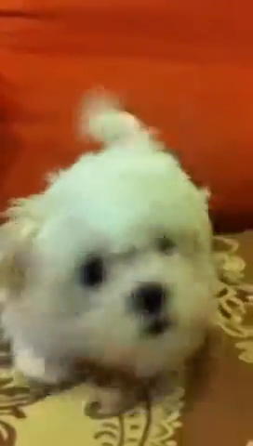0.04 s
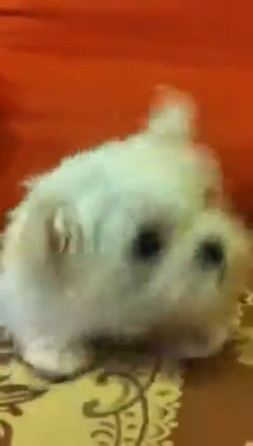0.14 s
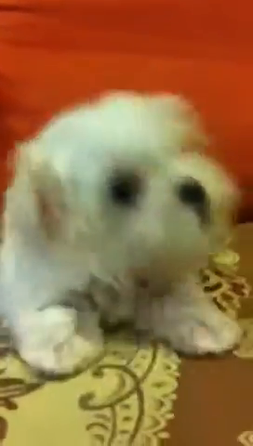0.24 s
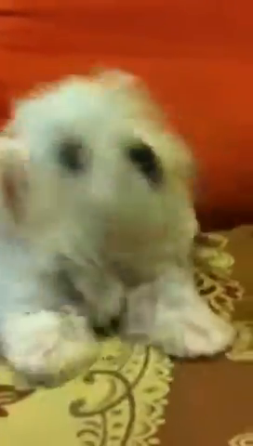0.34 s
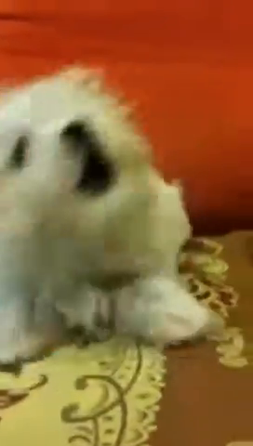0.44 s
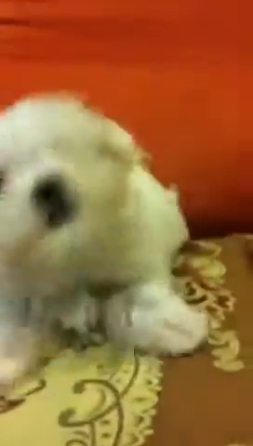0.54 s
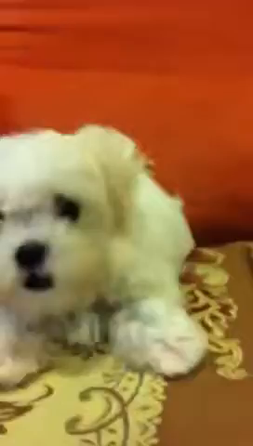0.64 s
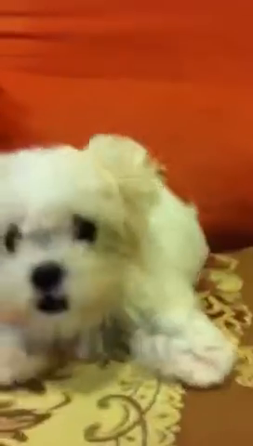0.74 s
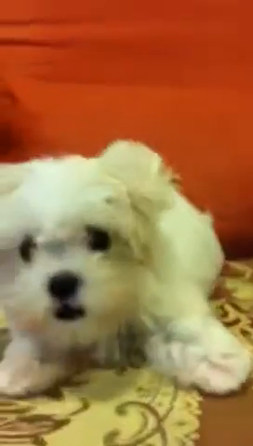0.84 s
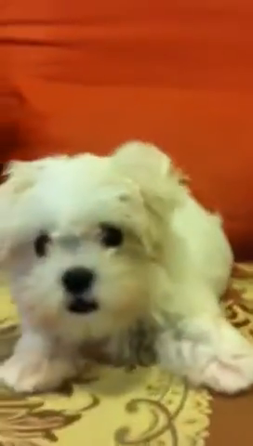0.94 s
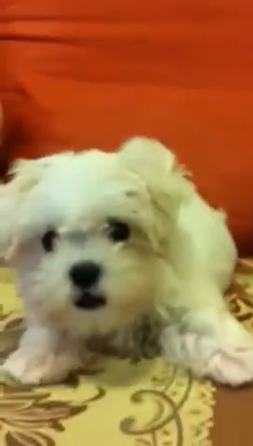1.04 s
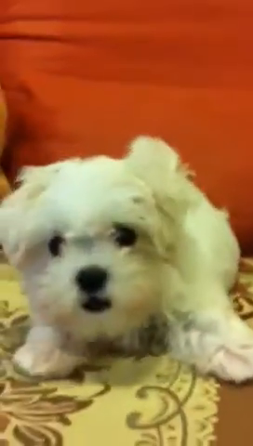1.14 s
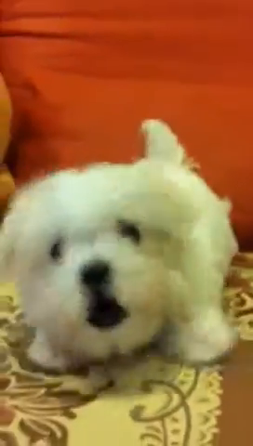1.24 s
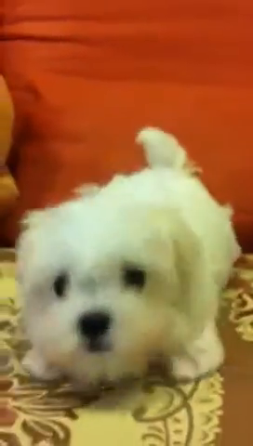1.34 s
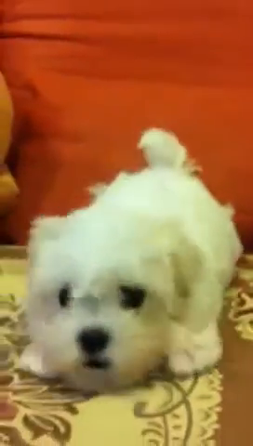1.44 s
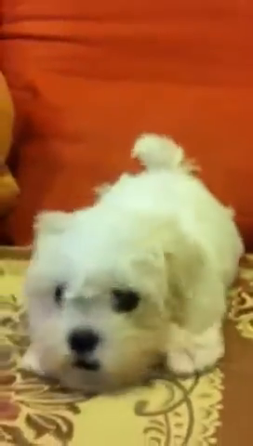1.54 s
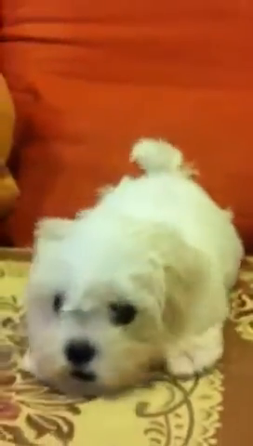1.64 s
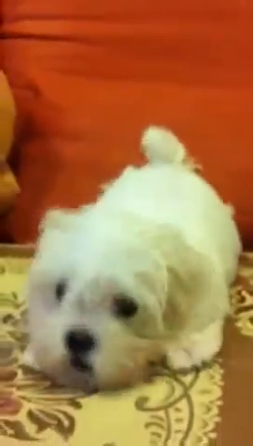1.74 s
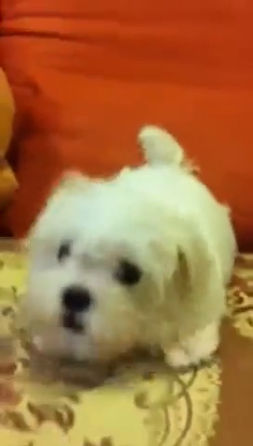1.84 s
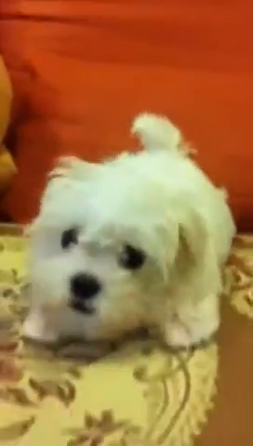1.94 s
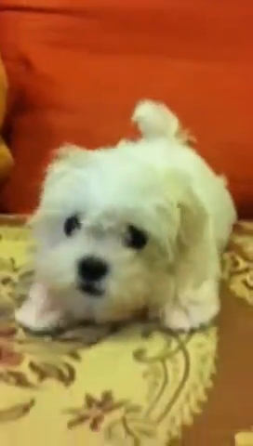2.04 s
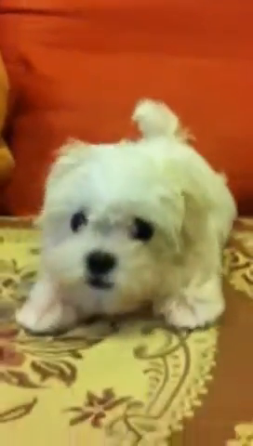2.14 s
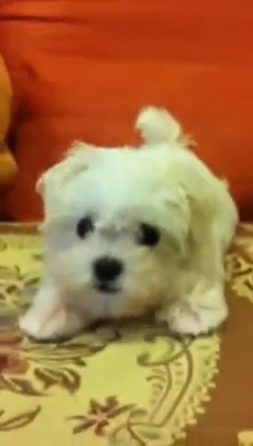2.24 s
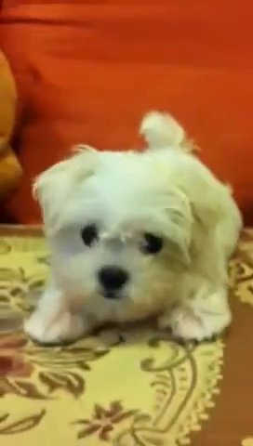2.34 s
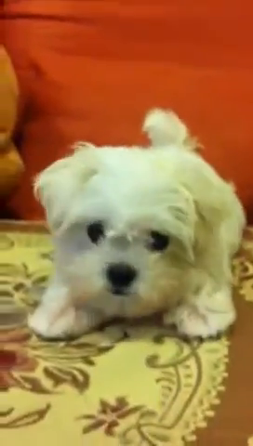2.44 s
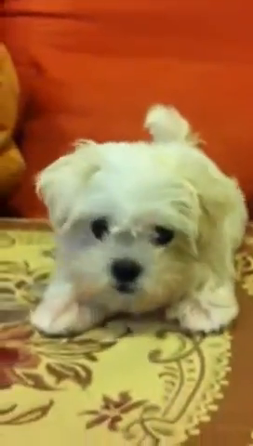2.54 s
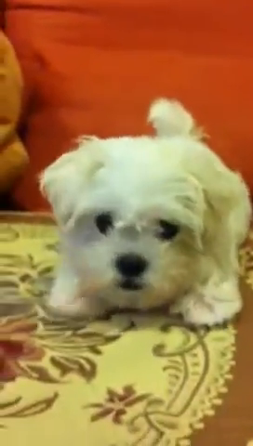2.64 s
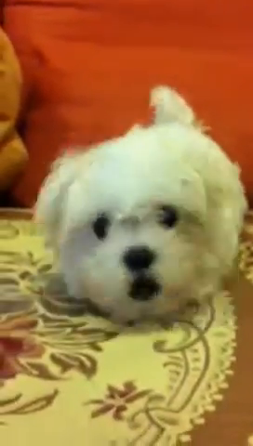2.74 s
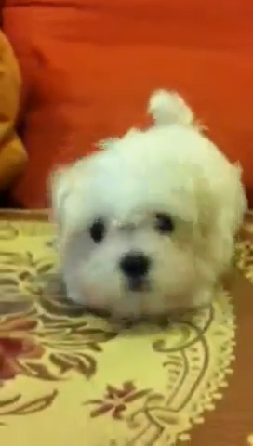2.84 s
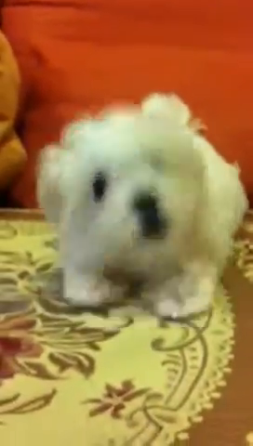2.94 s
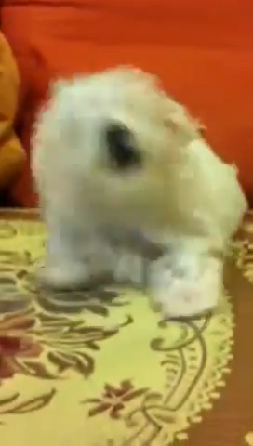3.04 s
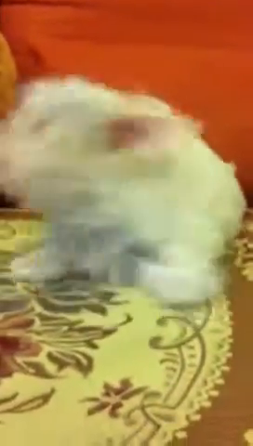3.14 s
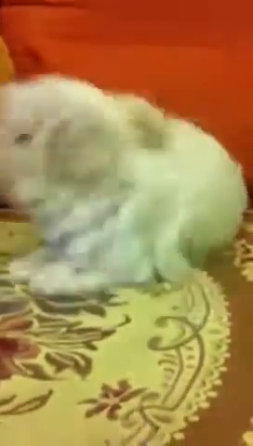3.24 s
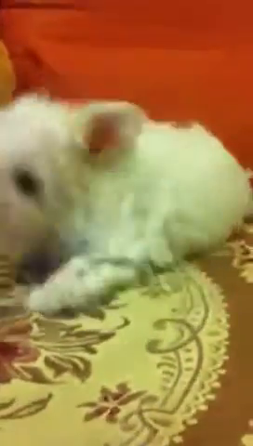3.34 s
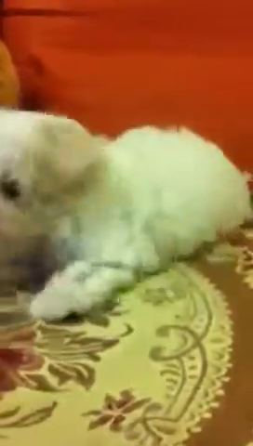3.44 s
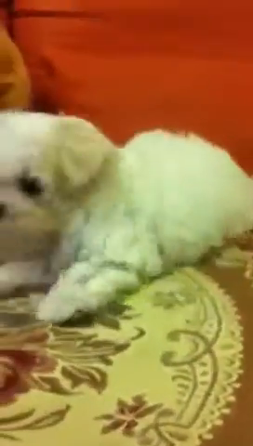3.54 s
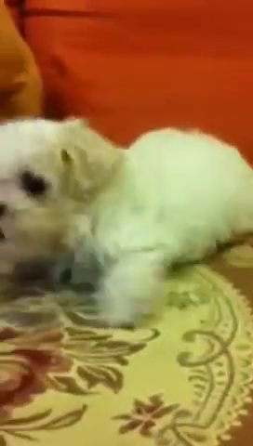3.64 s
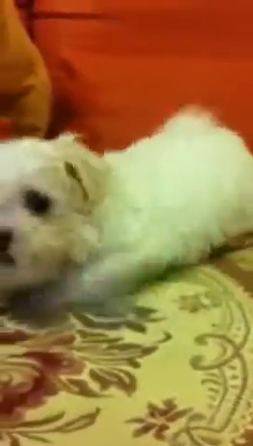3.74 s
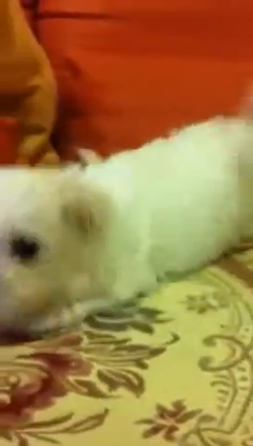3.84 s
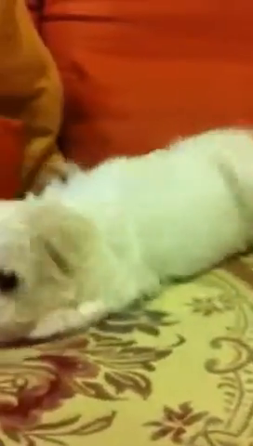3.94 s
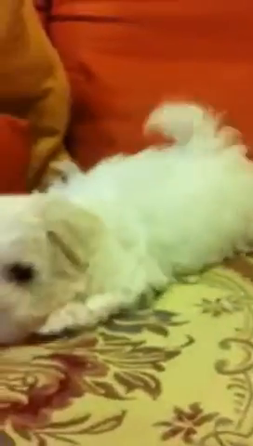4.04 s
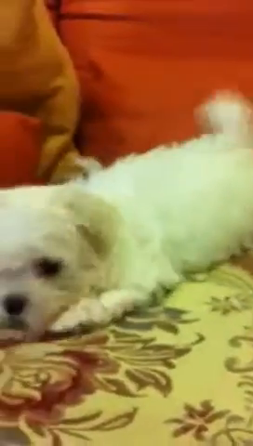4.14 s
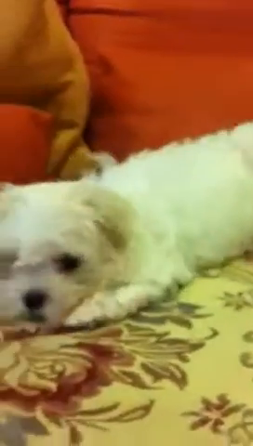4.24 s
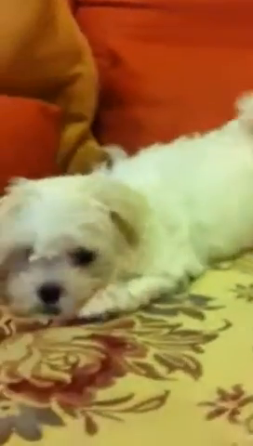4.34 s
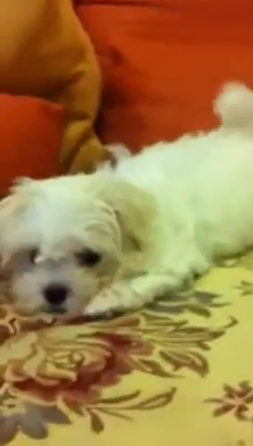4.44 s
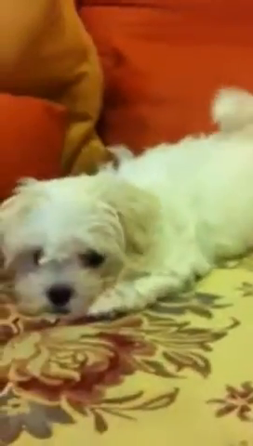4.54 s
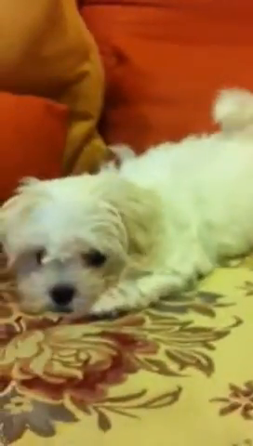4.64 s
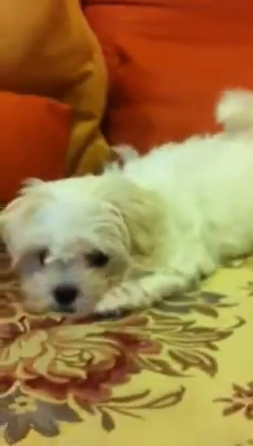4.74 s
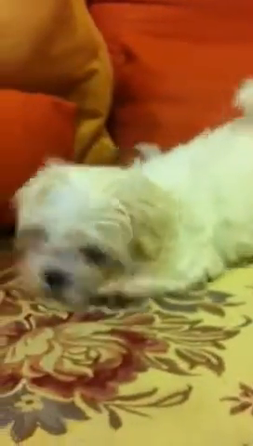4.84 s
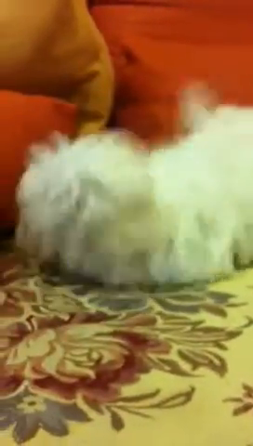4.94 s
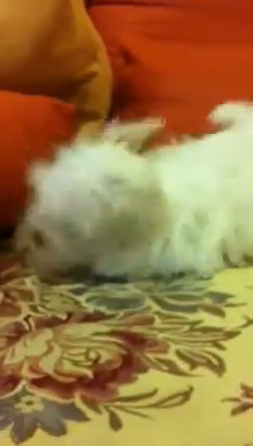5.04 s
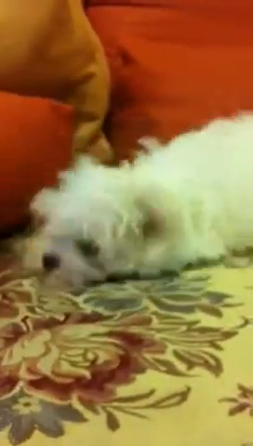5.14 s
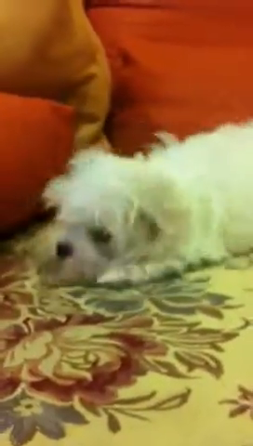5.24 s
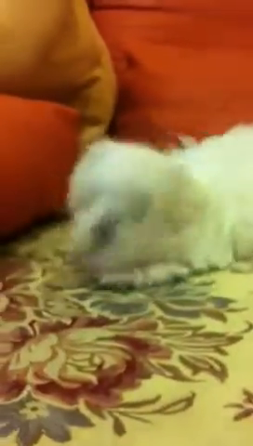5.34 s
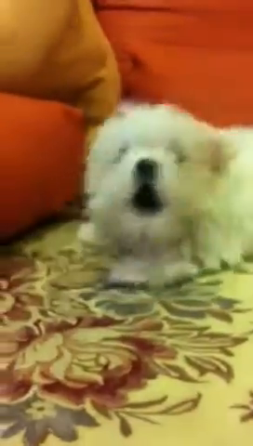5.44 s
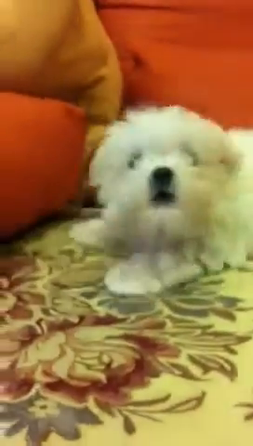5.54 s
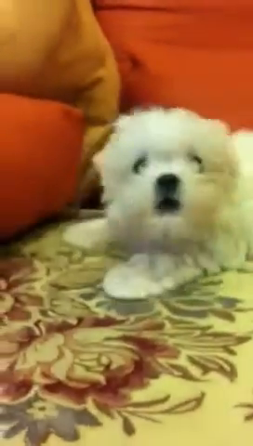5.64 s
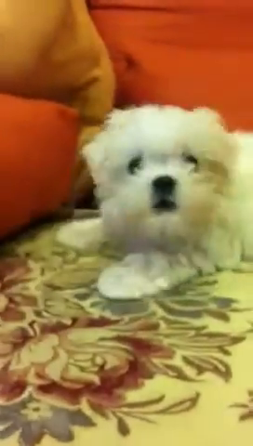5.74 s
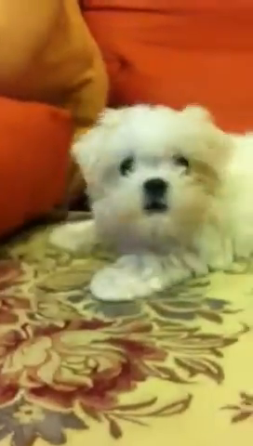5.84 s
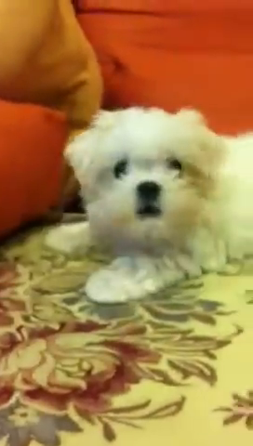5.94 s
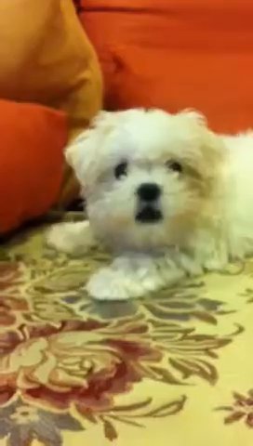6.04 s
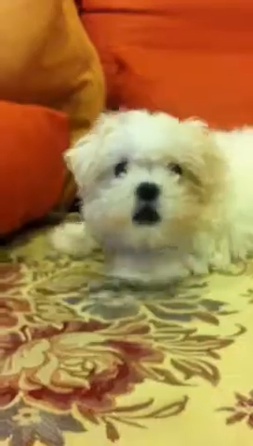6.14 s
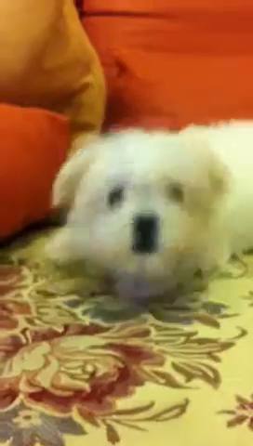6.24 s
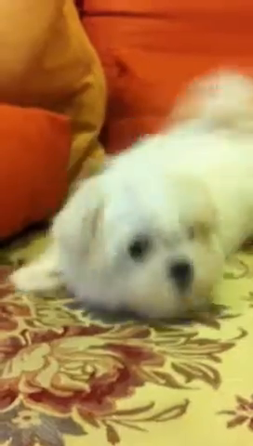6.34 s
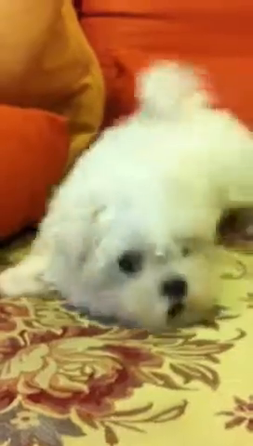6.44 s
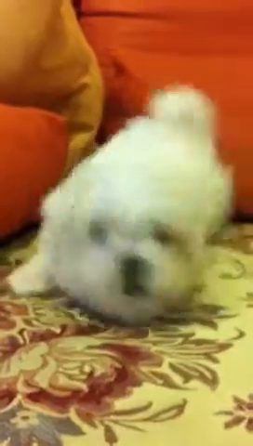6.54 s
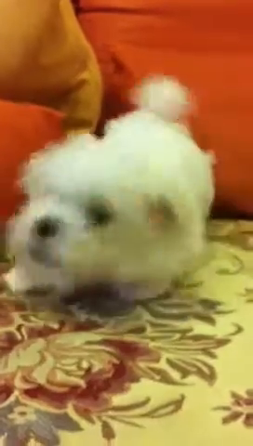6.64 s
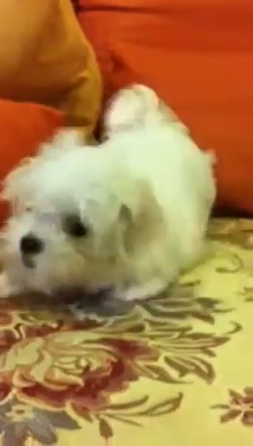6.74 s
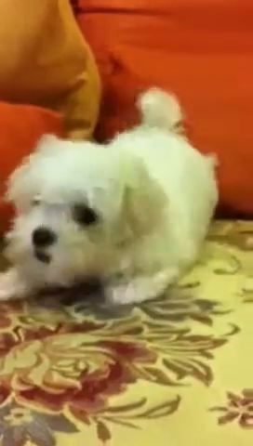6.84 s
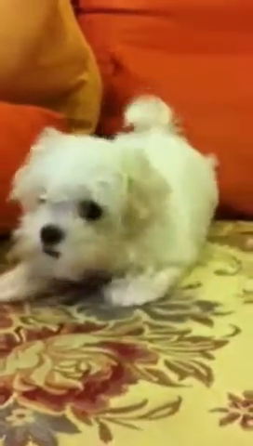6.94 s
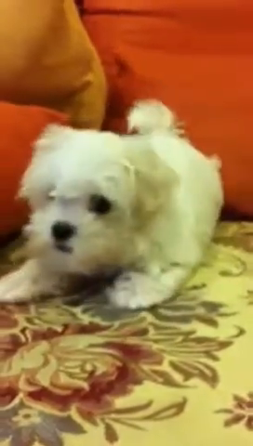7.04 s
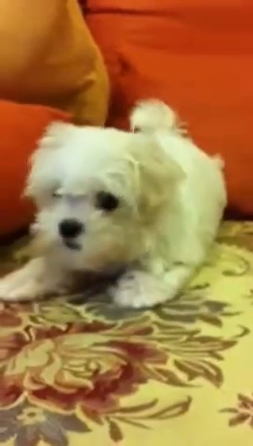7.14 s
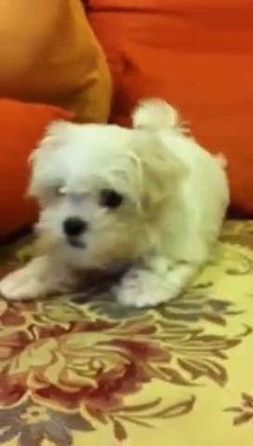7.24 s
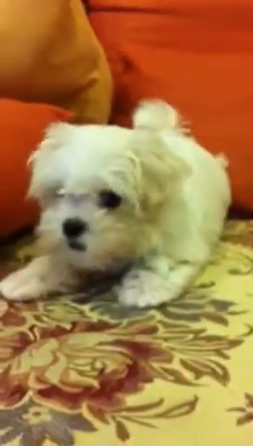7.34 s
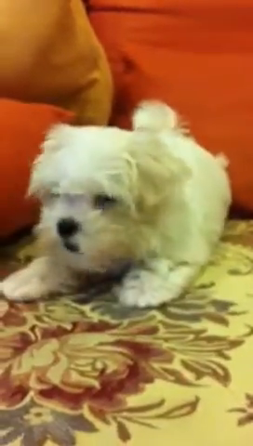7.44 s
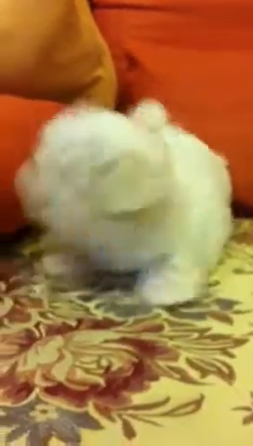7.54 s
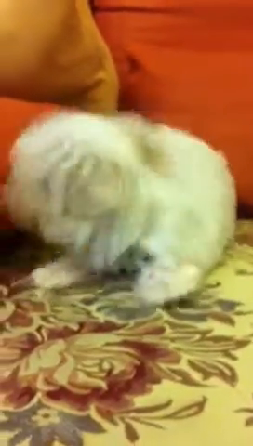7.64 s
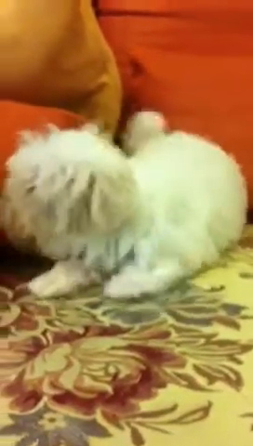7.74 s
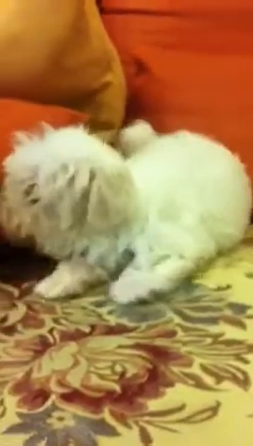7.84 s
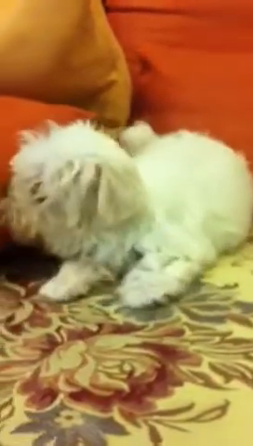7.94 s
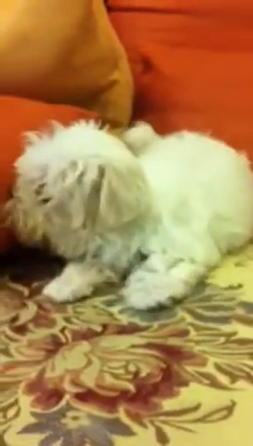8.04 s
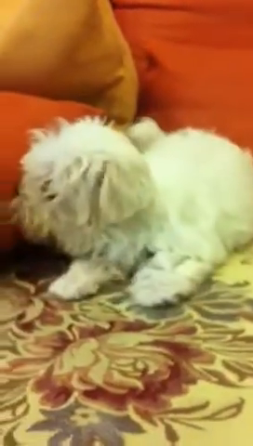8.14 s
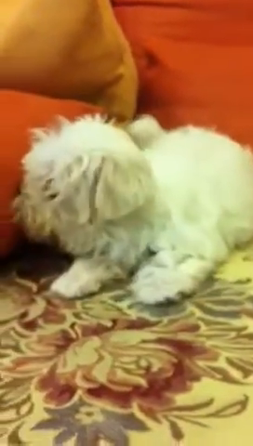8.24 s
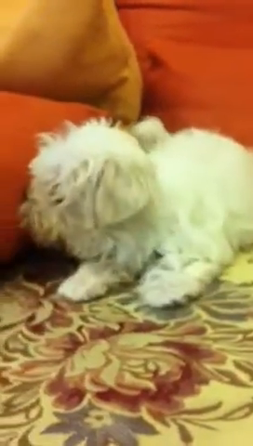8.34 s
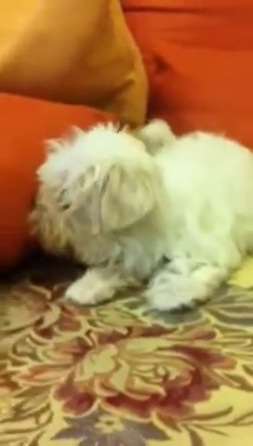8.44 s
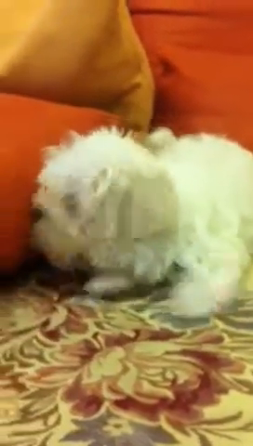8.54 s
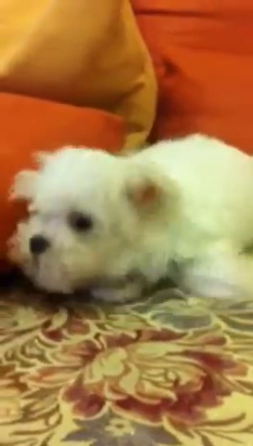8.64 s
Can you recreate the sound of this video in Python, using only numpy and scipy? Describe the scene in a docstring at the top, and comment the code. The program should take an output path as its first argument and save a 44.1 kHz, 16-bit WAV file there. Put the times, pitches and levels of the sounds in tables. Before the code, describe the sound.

High, rough puppy barks crack into falling squeaks, two at a time, broken by a quiet growl and wuff, with short indoor ring.

```python
"""Puppy yapping in a living room

A small puppy yaps close by, with short low glides around some yaps, a low growl and a wuff in the pause.
Each yap glides up, doubles its period, turns rough, then breaks into a falsetto that slides down.
Voices are sums of harmonics plus puffs of air, shaped by throat and mouth; paws are short noise ticks.
The room rings on after each sound over a faint hush, and a limiter holds the loudest peaks.
"""
import sys
import numpy as np
from scipy import signal
from scipy.fft import rfft, irfft
from scipy.io import wavfile
from scipy.ndimage import uniform_filter1d, minimum_filter1d

SR = 44100
rng = np.random.default_rng(int(sys.argv[2]) if len(sys.argv) > 2 else 0)


def dump(signal):
    """Clip the signal to [-1, 1] and save it as 16-bit WAV at the path in sys.argv[1]."""
    limited = np.clip(np.atleast_2d(signal).T, -1, 1)
    pcm = np.round(limited * 32767).astype(np.int16)
    wavfile.write(sys.argv[1], SR, pcm)


N = 383669  # length in samples
TOP_HZ = 15850  # nothing is heard above this

# the rising chest voice of each yap; brightness is treble against the rest, before the shared edge lift:
# (start t/s, top f/Hz, rise t/s, base level at the break/dB, swell/dB per s, throat resonance lift/dB,
#  brightness/dB)
CHEST_VOICES = [(-.08, 875.5, 0.071, -9.5, 7.5, 4, -16.5), (.454, 847.6, 0.076, -12.5, 2.5, 5, -21.5),
                (1.251, 968.5, .121, -11.5, 26, 2, -12), (1.792, 944.3, .153, -11, 67.5, 2, -25),
                (2.776, 937, 0.083, -10, 54.5, -1, -14.5), (3.25, 906.5, .122, -18.5, -10, 1.5, -22),
                (4.982, 948.4, .112, -14, -7, 6, -10.5), (5.442, 913, 0.15, -14, -4, 3.5, -16.5),
                (6.223, 874, .104, -16, -23.5, 4, -12), (6.627, 896, 0.1, -10, 46, 3.5, -23),
                (7.624, 929.6, .082, -10.5, 57, 3, -18), (8.617, 931.6, 0.089, -14.5, 15, 3, -13)]
# strain of the vocal folds in each yap:
# (period doubles t/s, half-tone level/dB, turns rough t/s, roughness 0-1, register breaks t/s)
FOLD_STRAIN = [ (0.0, -20, 0.0, .7, .022), (.522, -6, .542, .55, .553), (1.317, -3, 1.363, .7, 1.369),
               (1.878, -4, 1.908, .8, 1.912), (2.845, -6, 2.872, .8, 2.896), (3.318, -18, 3.316, .4, 3.339),
               (5.042, -15, 5.042, .6, 5.067), (5.505, -10, 5.505, .6, 5.547),
               (6.30, -7, 6.318, .65, 6.337), (6.685, -10, 6.73, .6, 6.749), (7.686, -5, 7.704, .7, 7.721),
               (8.68, -20, 8.68, .6, 8.686)]
# the falsetto that ends each yap, brightness before the shared edge lift:
# (first f/Hz, hold t/s, fall time constant t/s, level/dB, brightness/dB)
FALSETTO_VOICES = [(1547, 0.01, .082, -12, -23.5), (1330, 0.0055, 0.071, -6.5, -19),
                   (1468, 0.01, 0.075, -10, -19.5), (1425, .024, 0.025, -9, -24.5),
                   (1410, .001, .048, -10, -24), (1426, 0.012, .05, -7.5, -19.5),
                   (1524, .024, .034, -9.5, -14.5), (1566, 0.0057, .056, -9.5, -11.5),
                   (1534, .002, .058, -5, -21.5), (1560, 0.01, 0.048, -8, -20.5),
                   (1452, 0.011, 0.042, -10, -14), (1542, 0.00185, 0.0524, -9, -11)]
# the mouth in each yap:
# (lip resonance f/Hz, its lift level/dB, stretch of the throat resonances, crispness above 9 kHz level/dB)
LIP_SHAPES = [(2340, 8.5, 0.98, -2), (2080, 14, 0.98, 2), (2245, 6.5, 1.003, 0.5),
              (2590, -25.5, 1.012, -5.5), (2570, 10.5, 0.97, 2), (2410, 6.5, 1.068, -5.5),
              (3540, 11, 1.049, -10), (2200, 13, 1.01, -8), (2300, 4.5, 1.023, -0.5),
              (2120, 13.5, 0.97, -4.5), (3010, 15.5, 1.007, 2.5), (3030, 13, 0.98, -3)]
# throat and muzzle wide open, before each yap's stretch and crispness: (f/Hz, level/dB)
OPEN_THROAT = [(70, -61.5), (280, -21.5), (600, -11.5), (900, -5), (1150, -3.5), (1550, 4), (1900, -4.5),
               (2650, -14), (3250, -28), (4500, -19.5), (5900, -43), (7700, -32.5), (9400, -57),
               (12000, -43)]


def yaps(falsetto_db=-6, opening_hz=480, lips_width_hz=420, edge_db=.5, chest_hz=200,
         cavity_hz=3120, cavity_width_hz=700, cavity_db=-9):
    """Hoarse onset, clean rise, period doubling, a rough peak, then the falsetto clears as it falls."""
    out = np.zeros(N)
    for chest, high, strain, lips in zip(CHEST_VOICES, FALSETTO_VOICES, FOLD_STRAIN, LIP_SHAPES):
        split_s, half_db, rough_s, roughness, break_s = strain
        lips_hz, lips_db, stretch, crisp_db = lips
        t, hz, level_db, bright_db = yap_gesture(chest, high, break_s)
        falsetto = step(t, break_s, .002)
        halves = undb(half_db) * step(t, split_s, .003) * (1 - falsetto)
        # hoarse at low pitch, chaotic around the break
        hoarse = .6 * (1 - step(hz, 590, 80)) * (1 - falsetto)
        chaos = roughness * step(t, rough_s, .003) * (1 - step(t, break_s + .013, .012))
        rough = .04 + hoarse + chaos + .02 * falsetto
        # the falsetto loses its overtones, the more so as it sinks
        slope_db = falsetto_db * falsetto * (2 - step(hz, 840, 150))
        source = folds(hz, halves, rough, flutter_hz=432, slope_db=slope_db)
        throat = [(f * stretch, db + crisp_db * (f > 9000)) for f, db in OPEN_THROAT]
        wide = colour(source, throat)
        wide = resonate(wide, lips_hz, lips_width_hz, undb(lips_db))
        # a side cavity of the muzzle swallows a band between the resonances
        wide = resonate(wide, cavity_hz * stretch, cavity_width_hz * stretch, undb(cavity_db))
        # the jaw drops as pitch rises, and closes as it falls
        opening = step(hz, opening_hz, 88)
        sound = opening * gape(wide, t - break_s) + (1 - opening) * colour(source, SHUT_THROAT)
        add(out, project(sound, level_db, bright_db + edge_db), t[0])
    # the yaps carry little bass below about 200 Hz
    return signal.sosfilt(signal.butter(4, chest_hz, "high", fs=SR, output="sos"), out)


ONSET_HZ, RISE_BEND, SAG_HZ_PER_S = 297.2, 3, 1300  # pitch shoots up, levels off, then sags
FULL_CHEST_HZ, CHEST_DB_PER_OCTAVE = 730, 18.5  # below this pitch the voice weakens
FULL_FALSETTO_HZ, FALSETTO_DB_PER_OCTAVE = 1517, 25.5  # likewise in the falsetto
RESONANT_HZ, RESONANT_WIDTH_HZ = 754, 38  # here the second harmonic crosses the main throat resonance
BREAK_DB, BREAK_S = -1, 0.002  # the level dips briefly as the register breaks
EDGE_DB_PER_OCTAVE, DULLEST_HZ = 13, 500  # tighter folds sound brighter
PUFF_DB, PUFF_S = 10, 0.0033  # extra treble at the start, like a puff of air
STOP_HZ, RELEASE_DB_PER_S = 650, 897  # the voice dies once the falsetto sinks this low
LONGEST_YAP_S = .18


def yap_gesture(chest, falsetto, break_s):
    """Pitch rises, jumps at the break and falls; level and brightness follow pitch and time."""
    start_s, top_hz, rise_s, chest_db, swell_db_per_s, lift_db, chest_bright_db = chest
    high_hz, hold_s, fall_s, high_db, high_bright_db = falsetto
    t = max(start_s, 0) + np.arange(int(LONGEST_YAP_S * SR)) / SR
    age = t - start_s
    falling = np.maximum(t - break_s - hold_s, 0)

    # chest voice
    rising_hz = top_hz - (top_hz - ONSET_HZ) * np.maximum(1 - age / rise_s, 0) ** RISE_BEND
    rising_hz = rising_hz - SAG_HZ_PER_S * np.maximum(age - rise_s, 0)
    rising_db = chest_db + swell_db_per_s * (t - break_s)
    rising_db = rising_db + lift_db * bell(rising_hz, RESONANT_HZ, RESONANT_WIDTH_HZ)
    rising_db = rising_db + CHEST_DB_PER_OCTAVE * np.minimum(np.log2(rising_hz / FULL_CHEST_HZ), 0)
    edge_db = EDGE_DB_PER_OCTAVE * np.log2(np.maximum(rising_hz, DULLEST_HZ) / top_hz)
    rising_bright_db = chest_bright_db + PUFF_DB * np.exp(-age / PUFF_S) + edge_db

    # falsetto
    falling_hz = np.maximum(high_hz * np.exp(-falling / fall_s), ONSET_HZ)
    stopped = np.maximum(falling - fall_s * np.log(high_hz / STOP_HZ), 0)  # seconds since it sank to STOP_HZ
    falling_db = high_db - RELEASE_DB_PER_S * stopped
    falling_db = falling_db + FALSETTO_DB_PER_OCTAVE * np.minimum(np.log2(falling_hz / FULL_FALSETTO_HZ), 0)

    broken = step(t, break_s, .0012)
    hz = (1 - broken) * rising_hz + broken * falling_hz
    level_db = (1 - broken) * rising_db + broken * falling_db + BREAK_DB * bell(t, break_s, BREAK_S)
    bright_db = (1 - broken) * rising_bright_db + broken * high_bright_db
    return t, hz, level_db, bright_db


def gape(sound, since_break_s, jaw_hz=2250, jaw_width_hz=600, break_db=4, opening_db_per_s=110,
         least_db=-7, most_db=5.0, low_hz=1050, thinning_db=-6, thinning_s=.02):
    """The jaw opens wide: its upper resonance grows through the break, where the lows briefly thin out."""
    lift_db = np.clip(break_db + opening_db_per_s * since_break_s, least_db, most_db)
    lows = signal.sosfiltfilt(signal.butter(3, low_hz, fs=SR, output="sos"), sound)
    thinning = undb(thinning_db * bell(since_break_s, 0, thinning_s))
    return resonate(sound, jaw_hz, jaw_width_hz, undb(lift_db)) + (thinning - 1) * lows


def folds(hz, halves, rough, flutter_hz, slope_db=0):
    """The vocal folds: uneven pulses, half-tones between their harmonics, and a puff of air each cycle."""
    size = len(hz)
    jitter, shimmer, breathiness = .13, .4, .55  # wobble of pitch and loudness, and air, at full roughness
    wobbly_hz = hz * (1 + jitter * rough * flutter(size, flutter_hz))
    phase = 2 * np.pi * np.cumsum(wobbly_hz) / SR
    tone = np.zeros(size)
    for k in np.arange(1, 121) / 2:  # harmonic number, in halves
        gain = undb(slope_db * np.log2(np.clip(k, 1, 4))) * (k * hz < TOP_HZ)
        if k % 1:
            # alternating strong and weak cycles put lines between the harmonics, hardly any below the lowest
            half_tone_db = -20 if k < 1 else -1 if k < 2 else 3
            gain = gain * halves * undb(half_tone_db)
        # the shape of each pulse varies, which blurs the high harmonics most
        blur = min(.05 * k, 1.2) * flutter(size, flutter_hz)
        tone += gain * np.sin(k * phase + blur + rng.uniform(0, 2 * np.pi))
    air = rng.standard_normal(size) * (1 + np.cos(phase)) * np.sqrt(SR / hz / 4)
    return tone * np.exp(shimmer * rough * flutter(size, flutter_hz)) + breathiness * rough * air


def project(sound, level_db, bright_db):
    """Give a call its loudness and edge: harder closure of the folds raises the treble."""
    treble = signal.sosfiltfilt(signal.butter(6, 3300, "high", fs=SR, output="sos"), sound)
    low, high = even_out(sound - treble), even_out(treble)
    edges = signal.windows.tukey(len(sound), min(.009 * SR / len(sound), 1))  # soft start and end
    return (low + undb(bright_db) * high) * undb(level_db) * edges


def even_out(band):
    """Divide a sound by its own short-term loudness, so that it stays level."""
    window = np.hanning(500) / np.hanning(500).sum()
    return band / np.sqrt(np.convolve(band ** 2, window, "same") + 1e-12)


# throat and muzzle nearly shut: (f/Hz, level/dB)
SHUT_THROAT = [(50, -37.5), (150, -19), (270, 4.5), (500, -2), (800, 0), (1180, -3.5), (1450, -13),
               (2200, -8.5), (3100, -34), (4600, -29), (8500, -41), (15000, -32)]


def grumble(gesture, halves, rough):
    """A low, husky call: the folds sound through a nearly shut mouth."""
    out = np.zeros(N)
    t, hz, level_db, bright_db = gesture
    source = folds(hz, halves, rough, flutter_hz=170)
    add(out, project(colour(source, SHUT_THROAT), level_db, bright_db), t[0])
    return out


WUFF_START_S, WUFF_CREST_S, WUFF_LOUDEST_S, WUFF_END_S = 4.113, 4.167, 4.18, 4.2
WUFF_HZ, WUFF_RISE_OCTAVES_PER_S, WUFF_FALL_OCTAVES_PER_S = 588, 25, 36
WUFF_DB, WUFF_SWELL_DB_PER_S, WUFF_FADE_DB_PER_S = -22, 297.5, 801.5
WUFF_BRIGHT_DB, WUFF_BRIGHTENING_DB_PER_S = -29.5, 150.5  # it gains edge as it goes


def wuff_gesture():
    """Pitch climbs and tips over; the level peaks just after the crest and is cut short."""
    t = np.arange(WUFF_START_S, WUFF_END_S, 1 / SR)
    from_crest, from_loudest = t - WUFF_CREST_S, t - WUFF_LOUDEST_S
    octaves = np.minimum(WUFF_RISE_OCTAVES_PER_S * from_crest, -WUFF_FALL_OCTAVES_PER_S * from_crest)
    swell_db = np.minimum(WUFF_SWELL_DB_PER_S * from_loudest, -WUFF_FADE_DB_PER_S * from_loudest)
    bright_db = WUFF_BRIGHT_DB + WUFF_BRIGHTENING_DB_PER_S * from_loudest
    return t, WUFF_HZ * 2 ** octaves, WUFF_DB + swell_db, bright_db


def wuff(clear=0.27, raspy=0.49):
    """One gruff wuff: clearer as it climbs, its folds rasping past the crest."""
    gesture = wuff_gesture()
    rasp = clear + (raspy - clear) * step(gesture[0], WUFF_CREST_S + .004, .004)
    return grumble(gesture, halves=.36, rough=rasp)


HUSKY = .2  # roughness of the growl and the low glides, 0-1
GROWL_START_S, GROWL_HOLD_S, GROWL_LENGTH_S = 3.713, .135, .23
GROWL_HZ, GROWL_DB, GROWL_BRIGHT_DB = 271, -37.5, -32.5
GROWL_ATTACK_S, GROWL_SINK_OCTAVES_PER_S, GROWL_FADE_DB_PER_S = 0.0071, 12, 218.5
QUIVER_HZ, QUIVER_SHARE, QUIVER_DB = 28.7, 0.163, 1
GROWL_PUFF_DB, GROWL_PUFF_S = 15.5, 0.037  # extra treble at the start, like a hiss of air


def growl_gesture():
    """The growl swells, holds with a quivering pitch, then sinks as it fades."""
    age = np.arange(int(GROWL_LENGTH_S * SR)) / SR
    fading = np.maximum(age - GROWL_HOLD_S, 0)
    quiver = np.cos(2 * np.pi * QUIVER_HZ * age)
    hz = GROWL_HZ * (1 + QUIVER_SHARE * quiver) * 2 ** (-GROWL_SINK_OCTAVES_PER_S * fading)
    level_db = GROWL_DB - 20 * np.exp(-age / GROWL_ATTACK_S) - GROWL_FADE_DB_PER_S * fading
    level_db = level_db + QUIVER_DB * quiver
    bright_db = GROWL_BRIGHT_DB + GROWL_PUFF_DB * np.exp(-age / GROWL_PUFF_S)
    return GROWL_START_S + age, hz, level_db, bright_db


def growl():
    """The low growl: husky folds quivering behind a nearly shut mouth."""
    return grumble(growl_gesture(), halves=HUSKY, rough=HUSKY)


# short low glides around the yaps: soft grunts, and at 3.36 s the chest voice sinking beneath the falsetto;
# the level is that at the highest pitch:
# (start t/s, length t/s, first f/Hz, last f/Hz, level/dB, brightness/dB)
GLIDES = [(0.1, .09, 226.6, 136.5, -43, -33), (1.239, 0.021, 224.6, 296, -36, -26.5),
          (1.77, .03, 211, 250, -42.5, -27), (3.226, .033, 203, 258, -42, -18),
          (3.364, 0.062, 660, 248, -32, -21)]


def low_glides():
    """Short glides of the folds behind a nearly shut mouth: soft grunts and one sinking chest voice."""
    return sum(grumble(glide_gesture(*row), halves=0.19, rough=HUSKY) for row in GLIDES)


def glide_gesture(start_s, length_s, first_hz, last_hz, level_db, bright_db):
    """Pitch glides from first to last; the sound is loudest where it is highest."""
    hz = np.geomspace(first_hz, last_hz, int(length_s * SR))
    level_db = level_db + CHEST_DB_PER_OCTAVE * np.log2(hz / hz.max())
    return start_s + np.arange(len(hz)) / SR, hz, level_db, bright_db


# paws and claws on the rug, level before the shared trim: (t/s, level/dB)
PAW_TICKS = [(1.751, -42), (2.678, -42.5), (3.225, -37), (4.025, -39.5), (7.497, -48.5)]
# tone of the ticks: (f/Hz, relative level/dB)
PAW_TONE = [(150, -7), (600, 2.5), (1500, 0.5), (2400, 4.5), (3400, -21.5), (5300, -15.5), (9000, -35),
            (15000, -31)]


def paws(decay_s=0.001, trim_db=-5.5):
    """Tiny dry ticks as the puppy shifts its feet: coloured noise that dies at once."""
    out = np.zeros(N)
    t = np.arange(2048) / SR
    for s, db in PAW_TICKS:
        noise = unit(colour(rng.standard_normal(len(t)), PAW_TONE))
        add(out, noise * np.exp(-t / decay_s) * undb(db + trim_db), s)
    return out


# tone of the room's ring: (f/Hz, relative level/dB)
RING_TONE = [(150, -8.5), (500, 1.5), (900, -3), (1500, -5), (2000, -11), (2800, 5.5), (4500, 0), (8000, 0),
             (15000, -23.5)]
# time in which the ring drops by 60 dB: (f/Hz, t/s)
RING_TIME = [(200, .65), (700, 0.43), (1500, 0.61), (2800, 0.58), (4500, 0.35), (8000, 0.42), (15000, .2)]


def room(x, early_db=-17, early_s=.012, tail_db=-19.0, modes_db=-32, build_s=0.0025):
    """Quick reflections from floor and furniture, then a diffuse ring whose very top dies first."""
    t = np.arange(SR) / SR
    hz = np.fft.rfftfreq(SR, 1 / SR)
    noise = rfft(rng.standard_normal(SR))
    centres = np.geomspace(100, 16000, 16)
    tail = 0
    for centre, share in zip(centres, np.eye(len(centres))):
        band = irfft(noise * lookup(np.c_[centres, share], hz), SR)  # overlapping bands of noise
        decay = np.exp(-np.log(1000) * t / lookup(RING_TIME, centre))
        tail = tail + band * undb(lookup(RING_TONE, centre)) * decay
    tail = unit(tail * (1 - np.exp(-t / build_s)))
    early = unit(rng.standard_normal(SR) * np.exp(-t / early_s) * (t > .002))
    response = undb(early_db) * early + undb(tail_db) * tail + undb(modes_db) * lingering(t)
    return signal.fftconvolve(x, response / np.sqrt(SR))[:N]


# room resonances that linger, before the tilt: (f/Hz, relative level/dB)
LINGERING_TONES = [(1357, -67), (1421, -69), (1491, -65.5), (1744, -62), (2137, -70), (2202, -68),
                   (2358, -76.5), (2606, -69), (2799, -70.5), (2902, -71.5), (2998, -77), (3106, -79.5),
                   (3316, -77), (3435, -87), (3731, -86), (3876, -84), (4210, -84.5), (4317, -79.5),
                   (4468, -84), (4635, -85)]


def lingering(t, tilt_db=6, t60_s=0.44):
    """The room's strongest resonances ring on as fading sines; tilt in dB per octave."""
    ring = 0
    for hz, db in LINGERING_TONES:
        gain = undb(db + tilt_db * np.log2(hz / TOP_HZ))
        ring = ring + gain * np.sin(2 * np.pi * (hz * t + rng.random()))
    return unit(ring * np.exp(-np.log(1000) * t / t60_s))


# tone of the quiet house: (f/Hz, relative level/dB)
HUSH_TONE = [(18, -47.5), (30, -18.5), (69, -6), (208, -2.5), (350, -4), (410, -9), (518, -8.5),
             (970, -11.5), (1330, -8), (1470, -11.5), (1680, -11), (3070, -18), (4540, -22), (15500, -27)]
QUIET_DB = -65.5  # before the bass cut


def background(waver_db=-1.2, rumble_hz=55):
    """The faint, slightly wavering hush of the house: coloured noise with little deep bass."""
    hush = unit(colour(rng.standard_normal(N), HUSH_TONE))
    hush = hush * undb(QUIET_DB + waver_db * flutter(N, 3.8))
    return signal.sosfilt(signal.butter(2, rumble_hz, "high", fs=SR, output="sos"), hush)


def undb(db):
    """Decibels to gain."""
    return 10 ** (np.asarray(db) / 20)


def lookup(table, hz):
    """Read (Hz, value) points on a log-frequency axis."""
    points, values = np.transpose(table)
    return np.interp(np.log(np.maximum(hz, 1)), np.log(points), values)


def unit(x):
    """Scale to rms 1."""
    return x / np.sqrt(np.mean(x ** 2) + 1e-20)


def colour(x, table):
    """Filter by a (Hz, dB) spectrum."""
    return irfft(rfft(x) * undb(lookup(table, np.fft.rfftfreq(len(x), 1 / SR))), len(x))


def resonate(x, hz, width_hz, gain):
    """Scale a band around hz by a gain: above 1 it rings out, below 1 it is swallowed."""
    return x + (gain - 1) * signal.lfilter(*signal.iirpeak(hz, hz / width_hz, fs=SR), x)


def flutter(size, hz):
    """Random wobble of spread 1, up to about hz."""
    return unit(signal.sosfilt(signal.butter(4, hz, fs=SR, output="sos"), rng.standard_normal(size)))


def step(t, at, width):
    """A smooth switch from 0 to 1."""
    return .5 + .5 * np.tanh((t - at) / width)


def bell(x, centre, width):
    """A smooth bump of height 1."""
    return np.exp(-((x - centre) / width) ** 2)


def add(track, sound, at):
    """Mix a sound into the track at a time in seconds."""
    start = max(int(at * SR), 0)
    track[start:start + len(sound)] += sound[:max(len(track) - start, 0)]


def scene():
    """The puppy, its room and the hush behind."""
    puppy = yaps() + wuff() + growl() + low_glides() + paws()
    return (puppy + room(puppy) + background())[None]


def record(dry):
    """The phone's limiter turns down the loudest peaks; the top is cut."""
    ceiling = .71
    gain = np.minimum(1, ceiling / (np.abs(dry) + 1e-9))
    # hold each reduction for about 3 ms, then smooth it
    gain = uniform_filter1d(minimum_filter1d(gain, size=130), size=130)
    return signal.sosfilt(signal.ellip(10, .1, 80, TOP_HZ, fs=SR, output="sos"), dry * gain)


dry = scene()
out = record(dry)
dump(out)
```